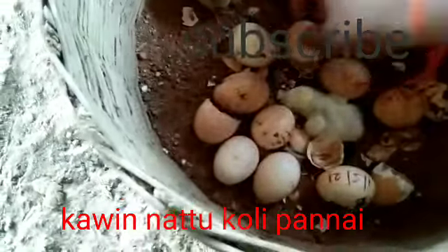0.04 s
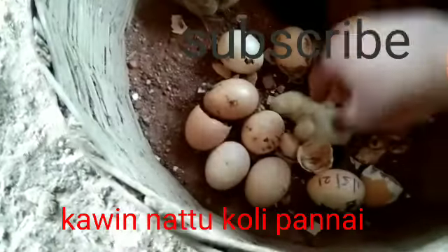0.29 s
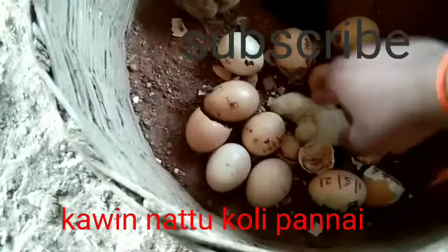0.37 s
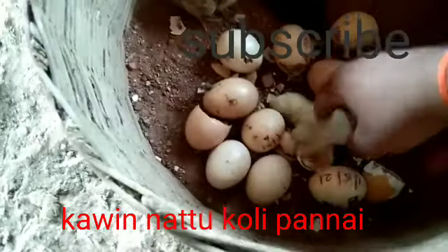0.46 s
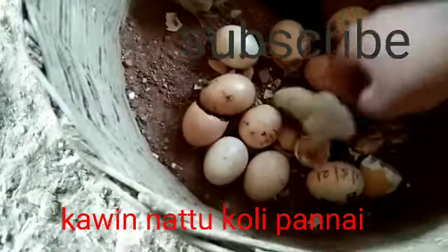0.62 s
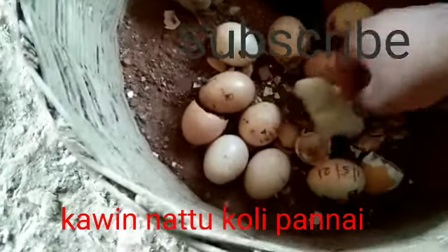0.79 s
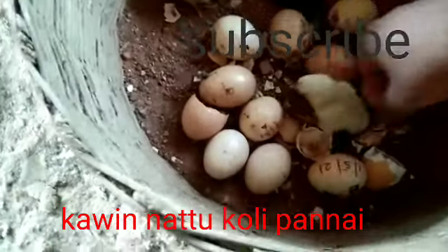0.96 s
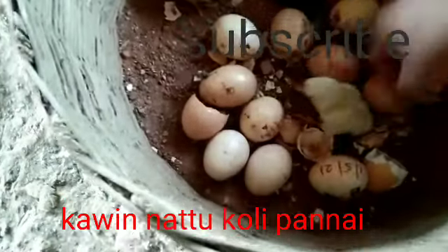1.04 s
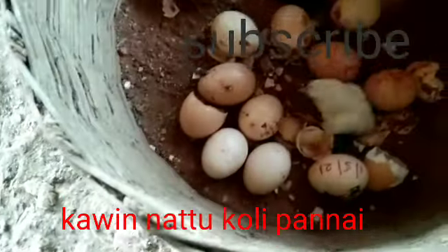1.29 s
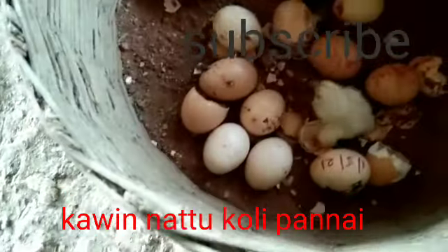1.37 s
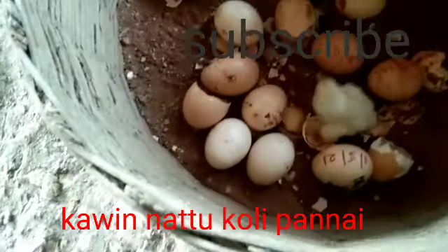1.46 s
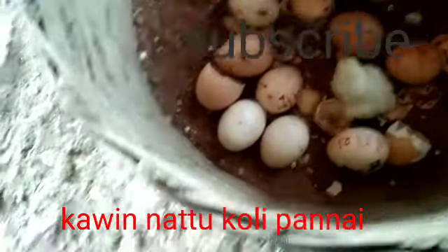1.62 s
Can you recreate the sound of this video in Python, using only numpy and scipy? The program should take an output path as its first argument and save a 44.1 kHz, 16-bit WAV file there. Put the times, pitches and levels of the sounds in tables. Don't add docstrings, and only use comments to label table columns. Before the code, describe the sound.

A close chick peeps once, loud and sliding down, after a brief crackle of straw and shell ticks; a softer arched peep follows, then faint cheeps, distant clucks and low wind rumble on the microphone.

```python
import sys
import numpy as np
from scipy import signal
from scipy.fft import rfft, irfft
from scipy.io import wavfile
from scipy.ndimage import uniform_filter1d

SR = 44100
rng = np.random.default_rng(int(sys.argv[2]) if len(sys.argv) > 2 else 0)


def master(y):
    cut = np.clip(np.atleast_2d(y).T, -1, 1)
    pcm = np.round(cut * 32767)
    wavfile.write(sys.argv[1], SR, pcm.astype(np.int16))


def nominal_scale(level):
    x = np.asarray(level, float) / 20
    return 10 ** x


N = 74970
EDGE_S = 0.0053


def rms_one(x):
    return x / np.sqrt(np.mean(x ** 2) + 1e-20)


def in_time(rows):
    s, *columns = np.transpose(rows)
    return [np.interp(np.arange(N) / SR, s, column) for column in columns]


def at_hz(points, hz):
    table_hz, table_value = np.array(points).T[:2]
    return np.interp(np.log(hz), np.log(table_hz), table_value)


def drift(rate_hz):
    r = np.exp(-2 * np.pi * rate_hz / SR)
    settle = 9000
    wander = signal.lfilter([1], [1, -2 * r, r * r], rng.standard_normal(N + settle))
    return rms_one(wander[settle:])


def gate(start_s, length_s):
    t = np.arange(N) / SR - start_s
    nearest_end = np.minimum(t, length_s - t + EDGE_S)
    return np.sin(np.pi / 2 * np.clip(nearest_end / EDGE_S, 0, 1)) ** 2


def coloured(spectrum):
    hz = np.arange(N // 2 + 1) * SR / N + 1
    inside = (hz > spectrum[0][0]) & (hz < spectrum[-1][0])
    white = rfft(rng.standard_normal(N))
    return rms_one(irfft(white * nominal_scale(at_hz(spectrum, hz)) * inside, N))


def hiss():
    # pitch_hz [Hz], level_db [dB per Hz]
    hiss_colour = [(300, -7.5), (1100, -21), (9900, -27), (10500, -15), (12100, -18.5), (12700, -30.5),
                   (13600, -19), (15500, -17.5)]
    return nominal_scale(-82.5) * coloured(hiss_colour)


def wind():
    # time_s [s], level_db [dB]
    gust = [
        (0, -85),
        (.78, -72.5),
        (.86, -67),
        (1.0, -57),
        (1.15, -61),
        (1.22, -56.5),
        (1.7, -56.5),
    ]
    # pitch_hz [Hz], level_db [dB]
    rumble = [(15, -55), (25, -6.5), (38, -24), (84, 2), (135, 2.5), (256, -17), (377, -27), (600, -58.5),
              (780, -77.5), (1320, -120)]
    return nominal_scale(in_time(gust)[0] + 0.5 * drift(6.2)) * coloured(rumble)


def room(x):
    # pitch_hz [Hz], t60_s [s]
    die_away = [(500, 0.33), (2000, 0.23), (4500, .45), (9000, 0.085)]
    # pitch_hz [Hz], level_db [dB]
    tail_colour = [(700, 5.5), (1200, 5.5), (2400, 3), (4300, -1), (7000, 7.5)]
    gap_s, stir_hz, stir_rad = 0.013, 30, 1.5
    t, tails, out = np.arange(SR) / SR, 0, 0
    white = rng.standard_normal((2, 4, SR))
    for k, hz in enumerate(180 * 2 ** np.arange(6.5, step=.25)):
        edges_hz = [hz / 2 ** .125, hz * 2 ** .125]
        band = signal.butter(2, edges_hz, "band", fs=SR, output="sos")
        dying_db = at_hz(tail_colour, hz) - 60 * t / at_hz(die_away, hz)
        tails = tails + signal.sosfilt(band, white[k % 2]) * nominal_scale(dying_db)
    for tail in tails * np.clip(t / gap_s, 0, 1) / np.sqrt(SR / 10):
        echo = signal.hilbert(signal.fftconvolve(x, tail)[:N * 1 + SR - 1])[:N]
        out = out + np.real(echo * np.exp(1j * stir_rad * drift(stir_hz)))
    return out


def far_calls(rows):
    out, t = np.zeros(N), np.arange(N) / SR
    hoarse = nominal_scale(2.5 * drift(60))
    waver = 1 + .007 * drift(45)
    for start_s, length_s, from_hz, to_hz, db in rows:
        hz = from_hz + (to_hz - from_hz) * np.clip((t - start_s) / length_s, 0, 1)
        whistle = np.sin(2 * np.pi * np.cumsum(hz * waver) / SR)
        out += np.sqrt(2) * nominal_scale(db) * gate(start_s, length_s) * whistle
    return out * hoarse


def far_fowl():
    # start_s [s], length_s [s],
    # from_hz [Hz], to_hz [Hz], level_db [dB]
    clucks = [(.19, 0.025, 751, 782, -76), (.19, 0.037, 539, 501, -77.5), (.312, 0.021, 917, 848, -80),
              (.485, 0.029, 1106, 1009, -78), (.99, 0.029, 1178, 1100, -69),
              (1.035, 0.02, 1150, 1200, -79.5), (1.01, 0.091, 786, 695, -80), (1.08, 0.023, 479, 451, -64),
              (.14, .09, 200, 184.7, -76), (1.308, 0.022, 1190, 1175, -72.5),
              (1.31, 0.037, 800, 838, -84.5), (1.36, 0.0067, 1150, 1150, -77.5)]
    return far_calls(clucks)


def brood():
    # start_s [s], length_s [s], from_hz [Hz], to_hz [Hz], level_db [dB]
    cheeps = [(.229, 0.0081, 6800, 6490, -55), (.238, .005, 7500, 7500, -61),
              (.248, 0.0032, 6940, 6670, -63), (.314, 0.0038, 3697, 3330, -45.5),
              (.408, 0.032, 4580, 4570, -63), (.478, 0.0074, 3800, 3700, -66.5),
              (.77, 0.048, 4255, 4180, -78), (.79, 0.031, 4100, 3680, -74.5),
              (.862, 0.013, 3700, 3660, -83.5), (.975, 0.012, 7100, 7100, -84.5),
              (.99, 0.029, 9090, 9100, -92), (1.028, 0.016, 3045, 3030, -83),
              (1.04, 0.013, 2660, 2498, -82.5), (1.148, 0.019, 3940, 3897, -79),
              (1.168, .014, 3450, 3380, -79.5), (1.19, 0.018, 3914, 3776, -90),
              (1.218, .014, 3210, 3132, -87), (1.388, 0.036, 2006, 2075, -76),
              (1.408, 0.019, 3200, 3145, -80), (1.63, 0.019, 4750, 4800, -88.5),
              (1.49, 0.017, 3670, 3593, -71), (1.688, 0.013, 3673, 3660, -84)]
    return far_calls(cheeps)


def grit(resonances):
    grains_per_s = 2700
    grains = rng.standard_normal(N) * (rng.random(N) < grains_per_s / SR) + 1e-18
    out = 0
    for hz, width_hz, db in resonances:
        edges_hz = [hz - width_hz / 2, hz + width_hz / 2]
        band = signal.butter(4, edges_hz, "band", fs=SR, output="sos")
        out = out + nominal_scale(db + 2.0 * drift(25)) * rms_one(signal.sosfilt(band, grains))
    return rms_one(out)


def straw():
    # time_s [s], level_db [dB]
    rustle = [
        (0, -50),
        (.03, -69.5),
        (.105, -75.5),
        (.117, -58.5),
        (.145, -71),
        (.17, -76),
        (.23, -80.5),
        (.3, -77.5),
        (.42, -103),
    ]
    # pitch_hz [Hz], width_hz [Hz], level_db [dB]
    stalks = [(200, 93.6, -3), (800, 250, -19), (2230, 320, 3), (3240, 760, -11.5), (4400, 600, -14),
              (5763, 299.6, -9), (7500, 2000, 5), (8550, 2000, 0), (11230, 1500, -7)]
    return nominal_scale(in_time(rustle)[0]) * grit(stalks)


def scuff(start_s, length_s, db, resonances):
    progress = np.clip((np.arange(N) / SR - start_s) / length_s - 1, -1, 0)
    swell_db = 6 * progress
    return nominal_scale(db + swell_db) * gate(start_s, length_s) * grit(resonances)


def egg_knock():
    # pitch_hz [Hz], width_hz [Hz], level_db [dB]
    cup = [(1100, 200, -7), (1417, 210, -5.5), (3040, 250, -7.5), (3800, 510, 8.5), (4400, 500, 4),
           (5540, 370, -7), (7100, 190, -7.5), (8320, 1360, 0.5), (10760, 2500, -3.5)]
    return scuff(.534, 0.012, -52, cup)


def grit_scuffs():
    # pitch_hz [Hz], width_hz [Hz], level_db [dB]
    hollow = [(348.4, 93, -11.5), (734, 174, 3.5), (995, 305, -5.5), (1240, 210, -5)]
    # pitch_hz [Hz], width_hz [Hz], level_db [dB]
    bright = [(3964, 470, 3.5), (8140, 410, 1), (9740, 1200, 1), (11570, 1200, -6), (13000, 1200, -7)]
    return scuff(1.442, 0.052, -52.5, hollow) + scuff(1.47, 0.0279, -59, bright)


def shells():
    # start_s [s], level_db [dB], brightness [dB per octave], run_s of the snaps [s]
    touches = [(.001, -53.5, 9.5, 0.0059), (.01, -51, -5, 0.0068), (0.066, -69.5, 12.5, 0.013),
               (0.112, -67, 7.5, 0.0025), (0.114, -58.5, 2, 0.0011), (.118, -64, 3.5, .003),
               (0.126, -69, 7, 0.0048), (0.139, -56, 7.5, 0.00093), (0.1397, -67.5, 5, 0.0019),
               (.541, -81, 5, 0.0061), (1.694, -84.5, -11, .0066)]
    # pitch_hz [Hz], level_db [dB], t60_s [s]
    ringing = [(800, -4, 0.056), (1150, -26, 0.0082), (1474, -0.5, 0.029), (2400, -16, 0.011),
               (2960, -6, 0.06), (3800, 7.5, 0.013), (4400, -1.5, 0.01), (5440, -3, 0.011),
               (7400, 2.5, 0.02), (7720, 9.5, 0.0037), (9010, -5, 0.0036), (10780, -10.5, 0.029),
               (11300, -11.5, 0.0074)]
    s, db, tilt, run_s = np.repeat(np.transpose(touches), 6, axis=1)
    s = s + run_s * rng.random(len(s))
    luck, out = rng.standard_normal((len(s), len(ringing))), np.zeros(N)
    for k, (hz, mode_db, t60_s) in enumerate(ringing):
        clicks = np.full(N + SR, 1e-18)
        click_db = db + mode_db + tilt * np.log2(hz / 3000) - 14.0
        clicks[(s * SR).astype(int)] = luck[:, k] * nominal_scale(click_db)
        r, w = nominal_scale(-60 / (t60_s * SR)), 2 * np.pi * hz / SR
        out += signal.lfilter([0, np.sin(w)], [1, -2 * r * np.cos(w), r * r], clicks[:N])
    return out


def twitter(rows):
    hz, db = uniform_filter1d(np.array(in_time(rows)), size=SR // 500, axis=1)
    t = np.arange(N) / SR
    phase = 2 * np.pi * np.cumsum(hz * (1 + .006 * drift(120))) / SR
    sounding = (t > rows[0][0]) * (t < rows[-1][0])
    return np.sqrt(2) * nominal_scale(db + 3 * drift(100)) * sounding * np.sin(phase)


def chatter():
    # time_s [s], pitch_hz [Hz], level_db [dB]
    trill = [
        (.352, 4350, -80),
        (.359, 4520, -78),
        (.366, 4746, -56),
        (.374, 4400, -67),
        (.378, 3798, -61),
        (.387, 4650, -53),
        (.396, 4690, -58),
        (.403, 3690, -47.5),
        (.414, 3730, -62.5),
    ]
    # time_s [s], pitch_hz [Hz], level_db [dB]
    dip = [
        (.119, 4740, -80.5),
        (.125, 4940, -58.5),
        (.131, 4570, -54.5),
        (.14, 4180, -54.5),
        (.148, 4670, -57.5),
        (.158, 4670, -61.5),
        (.164, 4830, -80),
    ]
    return twitter(trill) + twitter(dip)


def peep(rows, echo_db):
    smooth = uniform_filter1d(np.array(in_time(rows)), size=SR // 500, axis=1)
    hz, db, second_db, third_db = smooth
    t = np.arange(N) / SR
    phase = 2 * np.pi * np.cumsum(hz) / SR
    overtone_wobble_db, fourth_db = 5, -23
    tone = np.sin(phase) + nominal_scale(second_db + overtone_wobble_db * drift(120)) * np.sin(2 * phase)
    upper = np.sin(3 * phase) + nominal_scale(fourth_db) * np.sin(4 * phase)
    tone = tone + nominal_scale(third_db + overtone_wobble_db * drift(120)) * upper
    tone = tone * nominal_scale(db + 1.3 * drift(140)) * (t > rows[0][0]) * (t < rows[-1][0])
    echo_s, wall_cut_hz, low_cut_hz = .001515, 4900, 1950
    spectrum = rfft(tone)
    fine_hz = np.arange(spectrum.size) * SR / N + 1
    wall = nominal_scale(echo_db) / (1 + (fine_hz / wall_cut_hz) ** 10)
    echo = wall * np.exp(-2j * np.pi * fine_hz * echo_s)
    return irfft(spectrum * (1 + echo) / (1 + (low_cut_hz / fine_hz) ** 10), N)


def second_chick():
    # time_s [s], pitch_hz [Hz], level_db [dB], second_db and third_db partials [dB]
    arch = [
        (.644, 3400, -85, -45, -70),
        (.651, 3400, -56, -50, -70),
        (.66, 3500, -48, -45, -60),
        (.668, 3680, -49, -31, -55),
        (.676, 3760, -50, -31, -55),
        (.684, 3640, -47, -32, -55),
        (.691, 3440, -47, -42, -60),
        (.699, 3330, -55, -50, -70),
        (.705, 3320, -75, -48, -70),
    ]
    return peep(arch, -9)


def near_chick():
    # time_s [s], pitch_hz [Hz], level_db [dB],
    # second_db and third_db partials [dB]
    glide = [
        (.204, 5600, -78, -18, -60),
        (.22, 5555, -53, -23, -60),
        (.228, 5400, -43, -30, -60),
        (.235, 5120, -36, -30, -60),
        (.251, 4640, -29, -38, -58),
        (.26, 4090, -26.5, -46, -46),
        (.267, 3790, -32, -38, -50),
        (.2705, 3620, -28, -27, -42),
             (.274, 3420, -24.5, -22, -37),
        (.28, 3520, -20.5, -18, -42),
        (.29, 3320, -23.5, -14, -36),
        (.296, 3090, -27, -17, -46),
        (.301, 2850, -35, -26, -32),
        (.305, 2660, -48, 1, -20),
        (.31, 2440, -52, 11, -10),
        (.315, 2170, -57, 6, -20),
        (.32, 2050, -72, 0, -25),
    ]
    return peep(glide, -1.5)


def spilt(near):
    # pitch_hz [Hz], level_db [dB]
    spill = [(2000, -6.5), (2300, 9.5), (2800, 3.5), (3350, -11), (3900, -5), (5000, 2.5), (6500, -1),
             (9000, 12)]
    hz = np.arange(N // 2 + 1) * SR / N + 1
    return irfft(rfft(near) * nominal_scale(at_hz(spill, hz)), N)


def scene():
    near, second = near_chick(), second_chick()
    far = brood() + far_fowl() + shells()
    twitters = chatter()
    scuffs = egg_knock() + grit_scuffs()
    rumble = wind()
    to_room = nominal_scale(-19.5) * spilt(near) + nominal_scale(-18) * second + nominal_scale(-9.5) * far
    to_room = to_room + nominal_scale(-7) * scuffs + nominal_scale(-6) * twitters
    mix = near + second + far + twitters + scuffs + room(to_room)
    return (mix + straw() + rumble + hiss())[None]


def band_limit(x):
    return signal.sosfilt(signal.butter(12, 16200, fs=SR, output="sos"), x)


def record(dry):
    top_cut = signal.cheby2(14, 50, 16600, fs=SR, output="sos")
    return band_limit(signal.sosfilt(top_cut, dry))


dry = scene()
out = record(dry)
master(out)
```